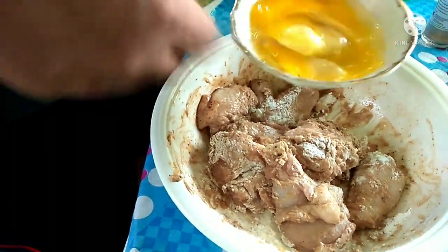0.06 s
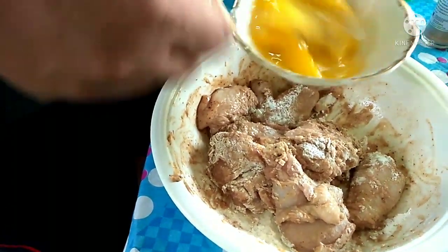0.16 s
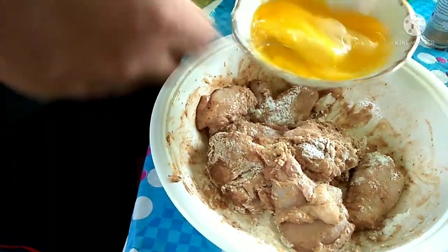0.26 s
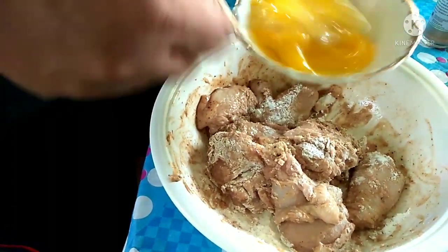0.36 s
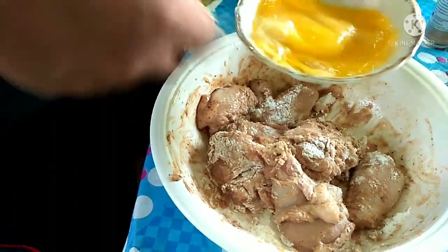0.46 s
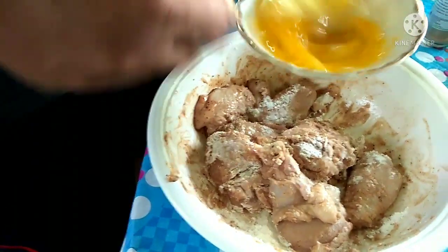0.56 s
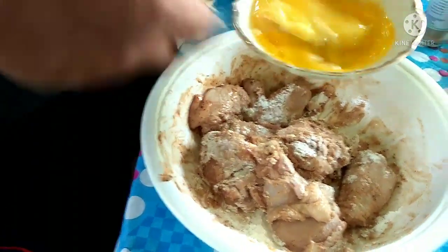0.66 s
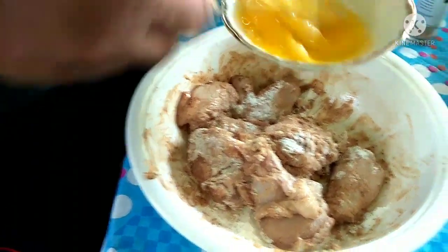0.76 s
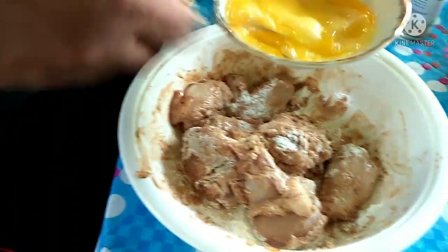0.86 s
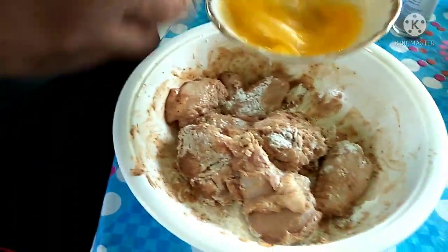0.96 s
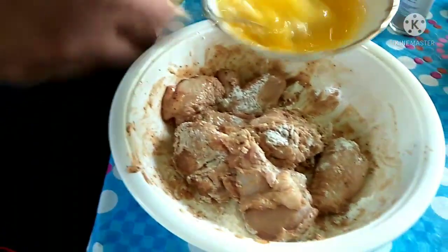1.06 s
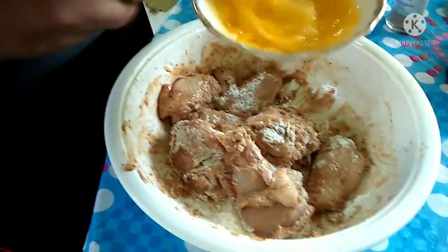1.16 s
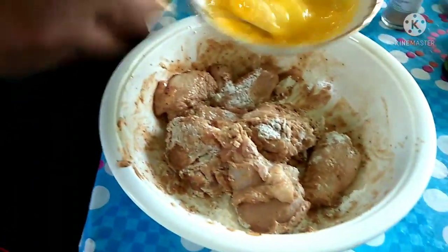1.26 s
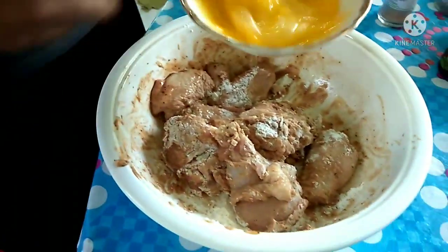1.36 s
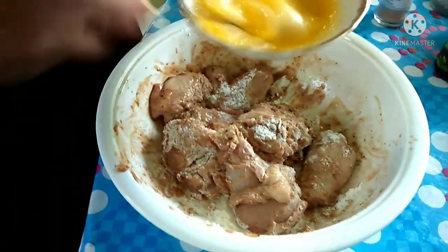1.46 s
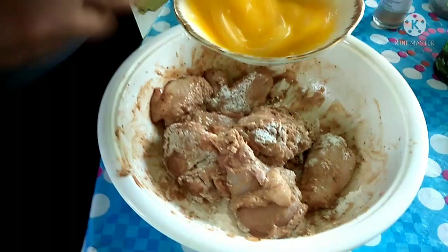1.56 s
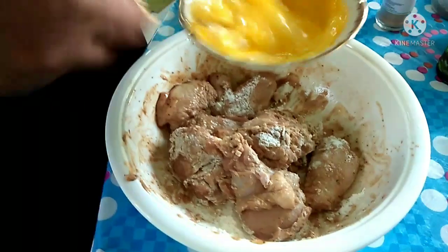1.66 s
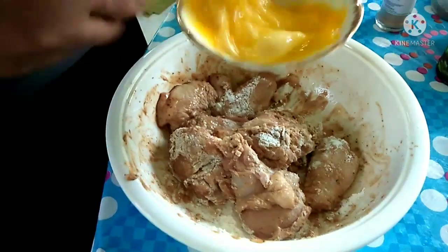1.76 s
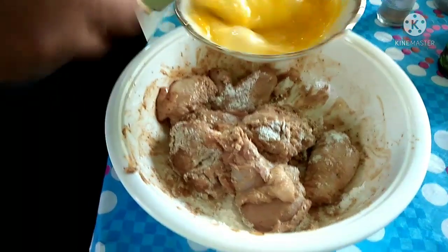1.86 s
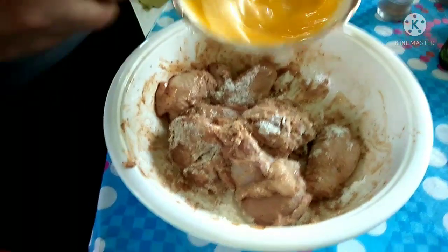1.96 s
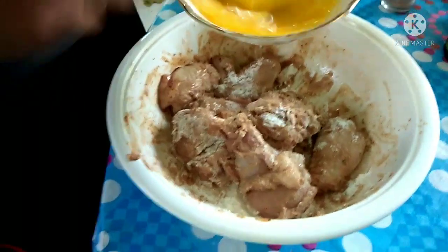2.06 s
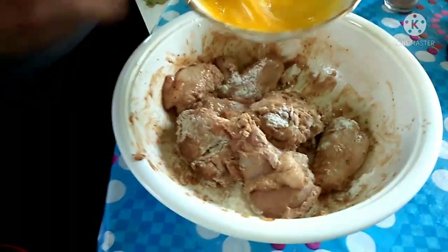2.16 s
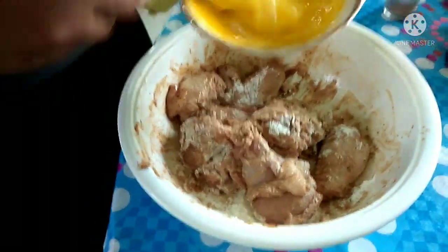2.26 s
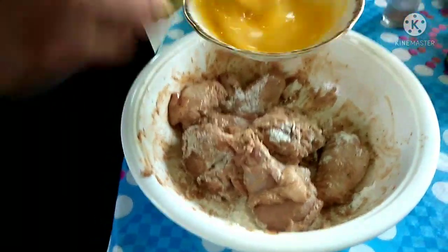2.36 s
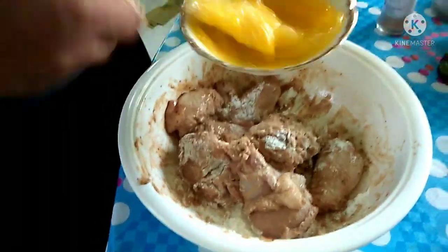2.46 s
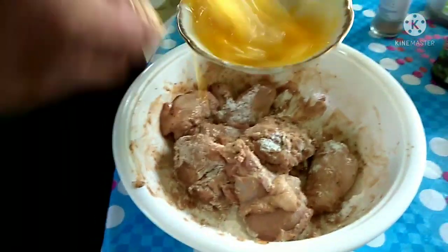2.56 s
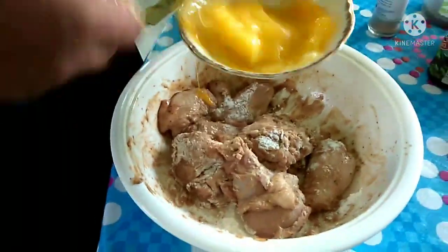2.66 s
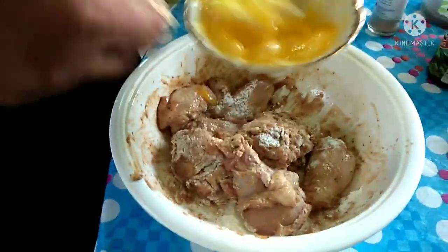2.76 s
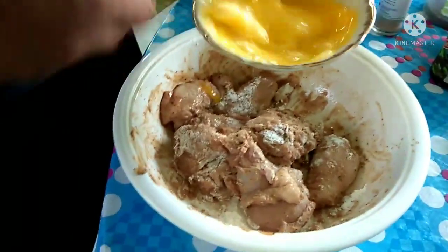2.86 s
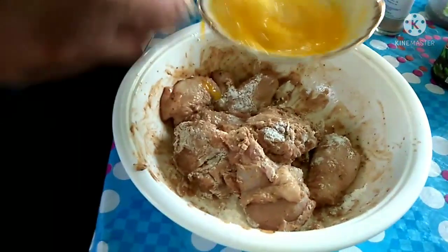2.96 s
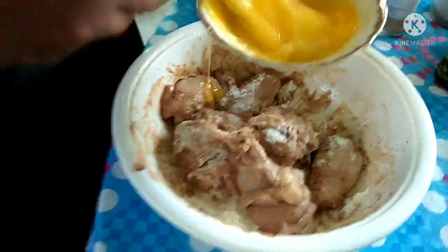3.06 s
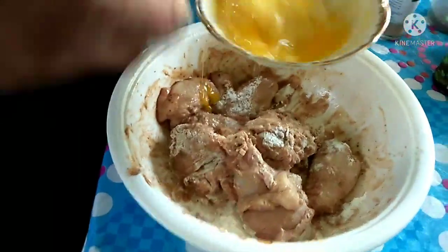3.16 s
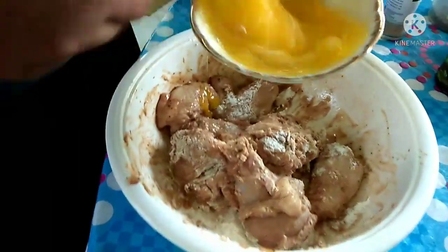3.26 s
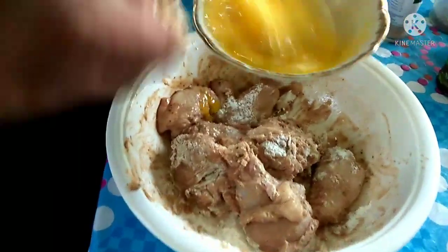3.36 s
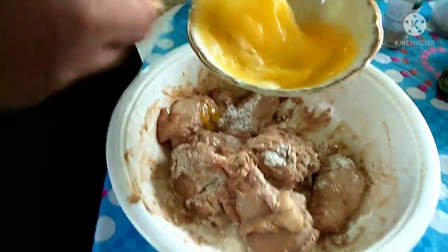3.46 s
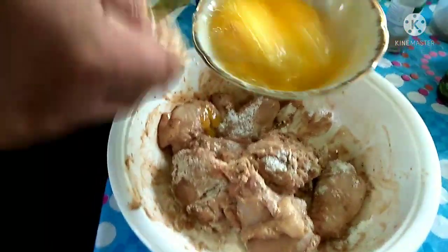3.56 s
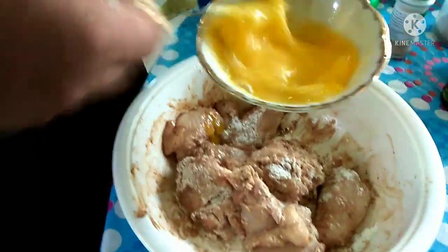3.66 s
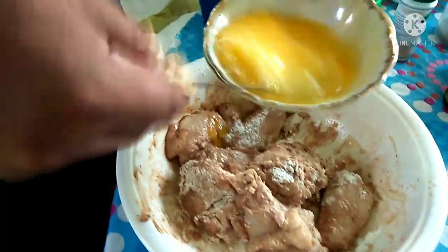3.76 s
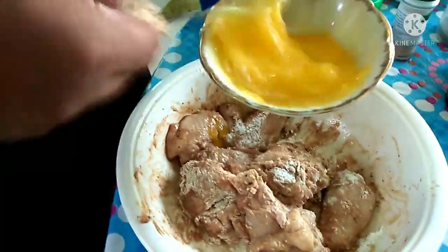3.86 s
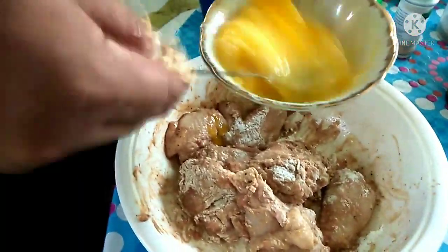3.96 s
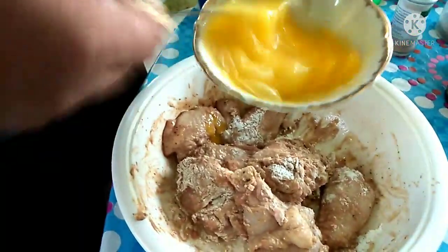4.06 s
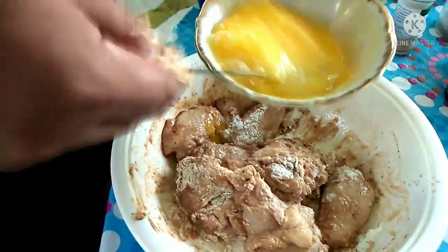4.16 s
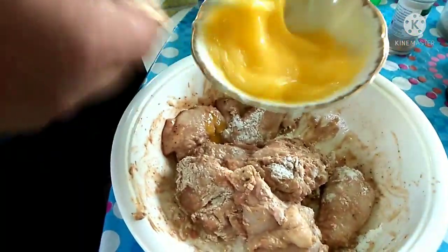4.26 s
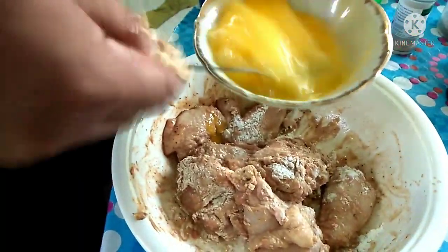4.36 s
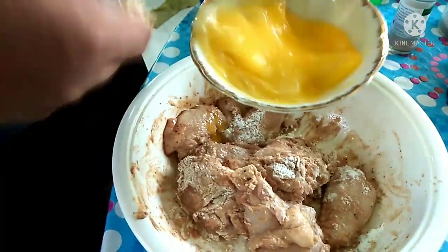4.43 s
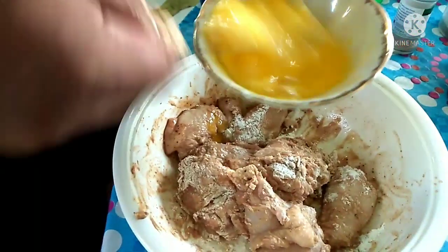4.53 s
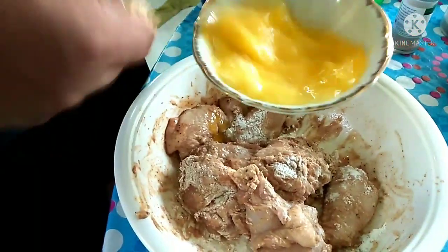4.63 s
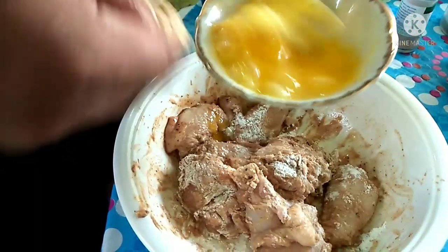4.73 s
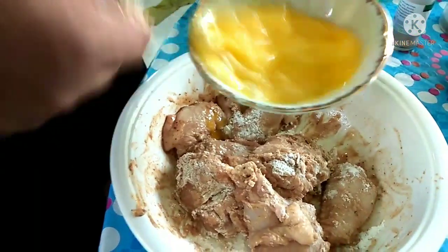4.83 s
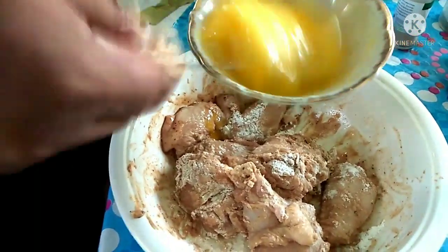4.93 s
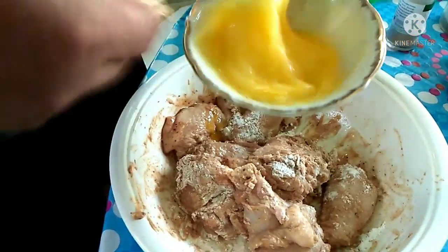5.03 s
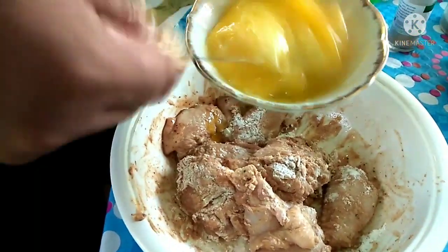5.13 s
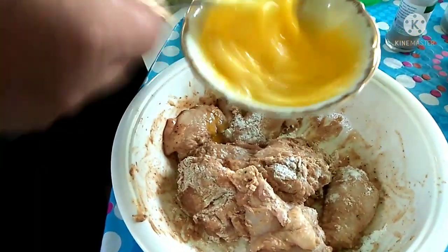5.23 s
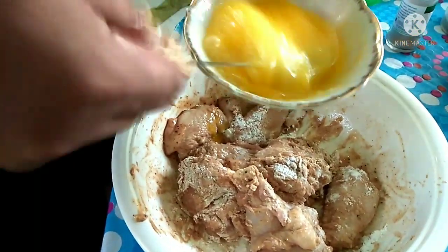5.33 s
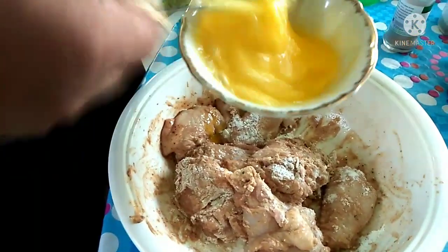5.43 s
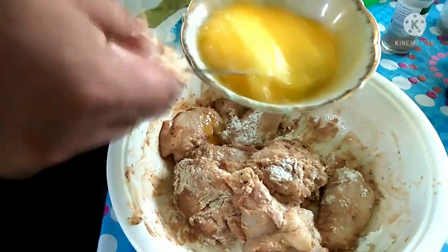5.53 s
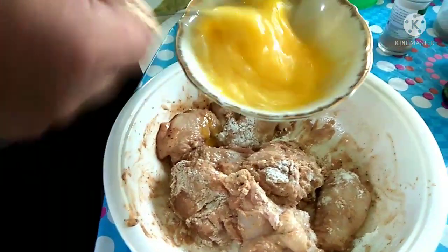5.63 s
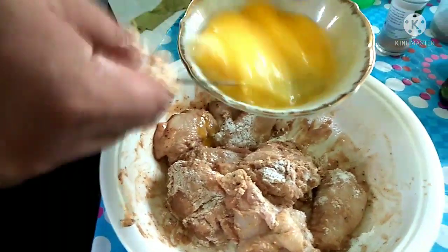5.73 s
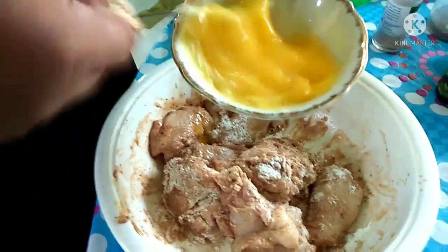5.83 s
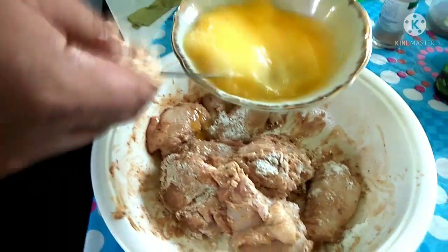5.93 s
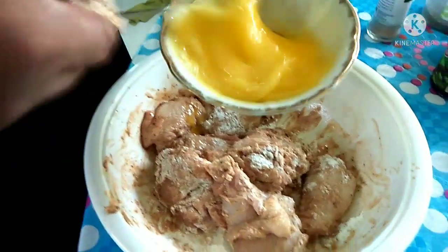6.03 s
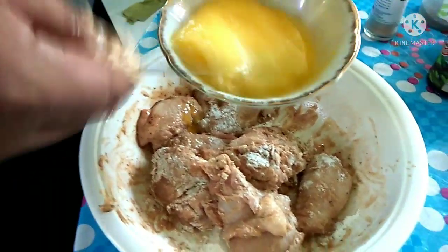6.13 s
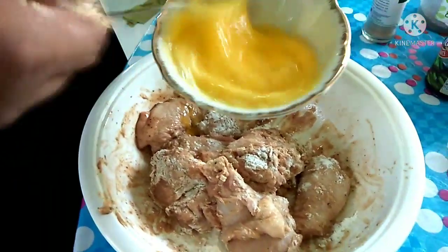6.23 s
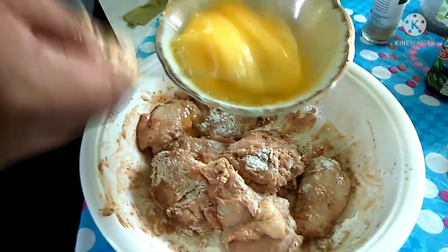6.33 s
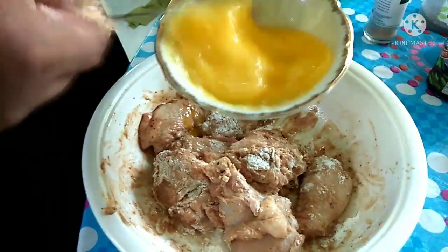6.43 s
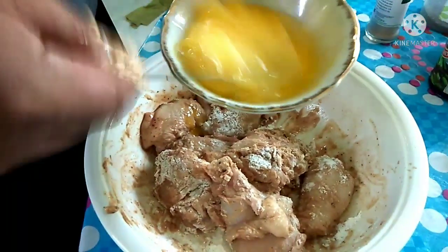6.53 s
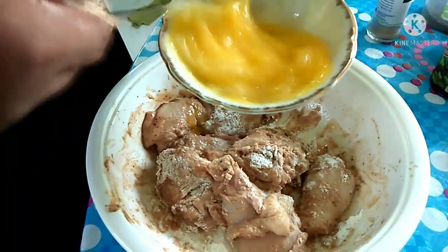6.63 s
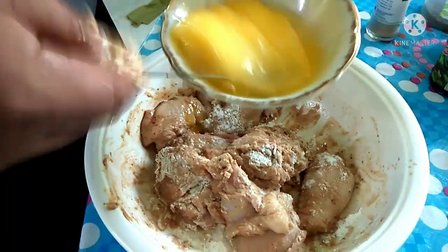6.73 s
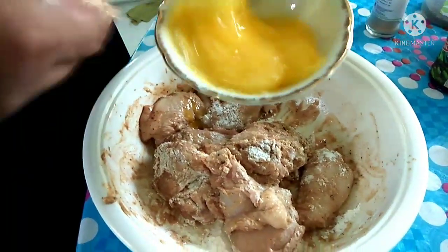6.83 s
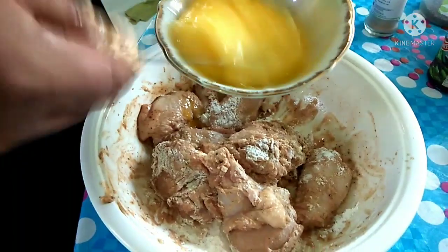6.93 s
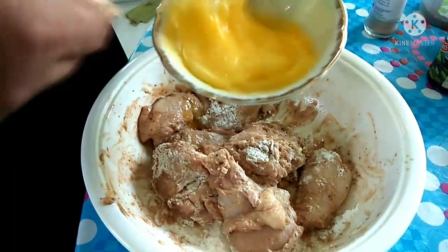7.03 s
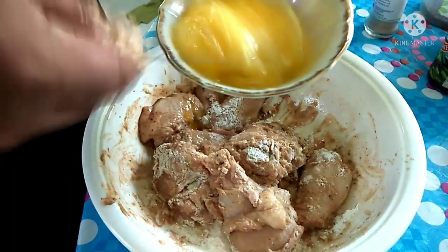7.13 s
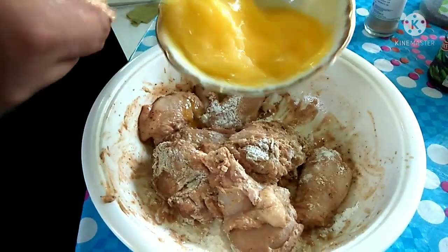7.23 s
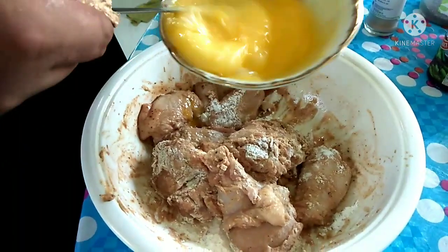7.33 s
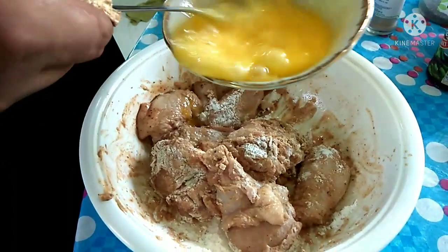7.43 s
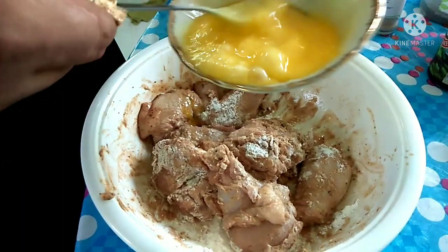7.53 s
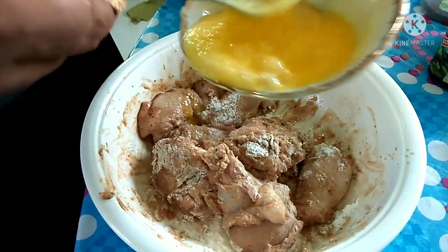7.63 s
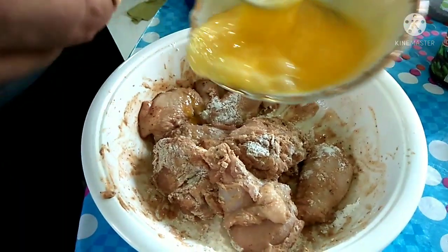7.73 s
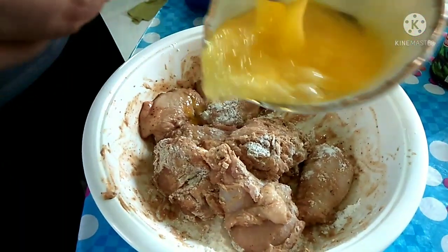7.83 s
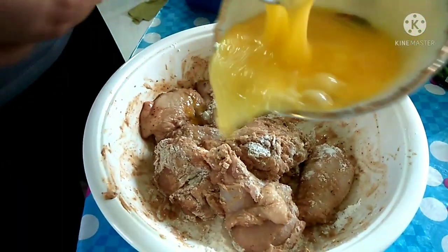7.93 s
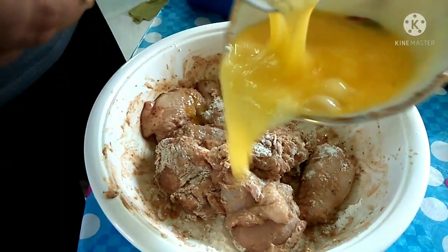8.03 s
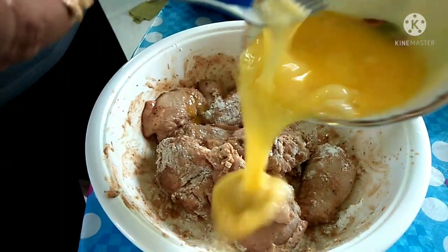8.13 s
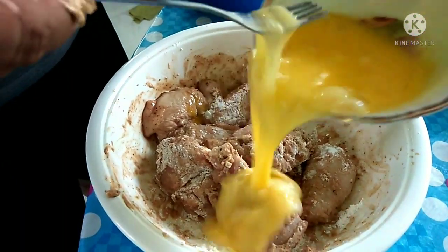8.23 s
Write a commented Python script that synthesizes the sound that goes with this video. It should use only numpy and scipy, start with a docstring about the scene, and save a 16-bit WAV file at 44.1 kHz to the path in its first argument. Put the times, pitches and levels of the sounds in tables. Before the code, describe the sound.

A fork beats eggs in a small hand-held ceramic bowl, close to a stereo microphone and slightly left, in a hard-walled kitchen with a short bright reverberation of about a quarter second. From 0 to 1.1 s the strokes are lighter and uneven, with a sharp clink near 0.35 s and a rounded plop around 0.33 s. From about 1.2 to 7.3 s it is fuller and steady, close to five strokes a second: each has a wet splash, a hissy tear of spray, midrange slosh, a gritty scrape and one or two short clinks, dulled by the egg. Scrapes are strongest between 1.3 and 3.3 s; small gliding bubble plops and soft low bumps are scattered through. At about 7.35 s the beating stops and its echo dies. Until about 8.4 s only quiet room air remains, with very faint low bumps around 7.7 to 8.05 s and tiny bubble blips near 8.2 s as the egg pours almost silently.

```python
"""A fork beats eggs in a small hand-held ceramic bowl, five strokes a second, in a hard-walled kitchen.
In each stroke the tines splash in, tear the egg into spray (noise grains), slosh it, trap air (gliding
decaying tones) and scrape the glaze; they tap the wall, whose egg-damped modes ring briefly.
The walls answer with decaying noise. The beating stops, the egg slides out almost silently, and faint
bumps and bubbles are left over the room air."""
import sys
import numpy as np
from scipy import signal
from scipy.fft import rfft, irfft, next_fast_len
from scipy.io import wavfile
from scipy.ndimage import uniform_filter1d, map_coordinates

SR = 44100
rng = np.random.default_rng(int(sys.argv[2]) if len(sys.argv) > 2 else 0)


def write(x):
    x = np.atleast_2d(x).T
    wavfile.write(sys.argv[1], SR, np.round(np.clip(x, -1, 1) * 32767).astype(np.int16))

N = 365588  # length in samples


def amp(db):
    """Level: a gain is ten to the power of dB over twenty."""
    return 10 ** (np.asarray(db) / 20)


def unit(x):
    """Normalisation: scale to rms 1."""
    return x / np.sqrt(np.mean(x ** 2) + 1e-20)


def along(points, hz):
    """Interpolation on a logarithmic frequency axis of (f/Hz, value) points."""
    f, v = np.transpose(points)
    return np.interp(np.log(hz + 1), np.log(f + 1), v)


def filtered(x, response):
    """Linear filtering: the spectrum is multiplied by a response of frequency."""
    n = x.shape[-1]
    padded = next_fast_len(n + 8192)
    return irfft(rfft(x, padded) * response(np.fft.rfftfreq(padded, 1 / SR)), padded)[..., :n]


def add(track, s, sound):
    """Superposition: mix a sound into a track from time s."""
    start = max(round(s * SR), 0)
    part = track[..., start:start + sound.shape[-1]]
    part += sound[..., :part.shape[-1]]


# Main source: whisking

# Beating strokes: plunge t/s, sweep to the wall/s, drag after it/s, touch of the tines level/dB,
# entry splash level/dB, egg spray level/dB, tine scrape level/dB, slosh level/dB
STROKE_TABLE = [ (0, 0.0013, .015, -63, -50, -44, -47.5, -51.5),
                (0.1074, 0.066, .03, -36, -50.5, -49.5, -55, -49.5),
                (0.3264, .023, .04, -24, -62, -31.5, -37, -37),
                (0.546, 0.012, 0.048, -34, -44.5, -35.5, -38, -38.5),
                (0.757, 0.014, 0.031, -58, -60.5, -41.5, -45.5, -38),
                (0.9506, 0.023, 0.049, -51, -50, -41, -44.5, -41),
                (1.145, 0.015, 0.057, -58, -56, -37, -31.5, -38.5),
                (1.3159, 0.022, 0.081, -39, -53, -27.5, -22.5, -34.5),
                (1.5229, 0.031, 0.076, -40, -51.5, -34, -31, -32),
                (1.736, 0.014, 0.055, -52, -53.5, -34.5, -27.5, -31),
                (1.917, .026, 0.067, -22, -36, -31, -25, -36),
                (2.1114, 0.022, 0.058, -42, -57.5, -32, -28.5, -34.5),
                (2.2995, .022, 0.051, -34, -55.5, -30.5, -32, -37),
                (2.514, 0.016, 0.062, -60, -62.5, -38.5, -38, -40),
                (2.712, 0.0087, 0.048, -55, -53, -34.5, -34, -38),
                (2.92, 0.027, 0.046, -33, -32, -32.5, -33, -34.5),
                (3.1, 0.011, 0.079, -59, -53, -35.5, -26.5, -36),
                (3.284, 0.014, 0.064, -54, -52, -30.5, -27, -35.5),
                (3.457, 0.05, .03, -22.5, -40, -35.5, -44, -40),
                (3.669, .031, .04, -25, -45.5, -35.5, -32.5, -31.5),
                (3.8527, 0.066, 0.029, -21.5, -46.5, -27, -27.5, -33),
                (4.0869, 0.011, 0.044, -26.5, -52, -45.5, -43.5, -42.5),
                (4.25, .028, 0.069, -27, -39, -31, -31, -36), (4.454, 0.034, .03, -20, -50, -33, -38, -30),
                (4.6636, 0.032, 0.011, -29.5, -55, -32.5, -32.5, -36),
                (4.8516, .039, .04, -32.5, -37, -33.5, -38, -36.5),
                (5.054, 0.014, .045, -25, -39, -31, -33.5, -31.5),
                (5.2626, 0.017, 0.063, -35, -39, -33, -35.5, -33.5),
                (5.472, .016, .05, -62, -50.5, -34.5, -46, -34.5),
                (5.6593, .038, .02, -35, -46, -40, -53, -38.5),
                (5.8592, .041, 0.03, -30, -35.5, -31, -31.5, -30),
                (6.0621, .025, .05, -26, -56, -34, -39, -34.5),
                (6.2652, 0.028, 0.086, -24.5, -48, -26.5, -28, -33.5),
                (6.4713, 0.053, 0.016, -36, -44, -38, -42.5, -42),
                (6.6709, 0.058, 0.015, -27, -49.5, -25.5, -33.5, -29.5),
                (6.8684, 0.049, 0.045, -34, -29.5, -38.5, -38.5, -37),
                (7.0694, .028, .04, -23, -43, -32, -29, -37.5),
                (7.272, 0.041, .02, -37, -33, -38.5, -42, -49)]
WAKE_DB_PER_S = 121  # the wake fades as the fork slows past the wall
SPLASH_S = .008  # time constant of the splash as the tines enter


def stroke_gain(release, order, skim=.004, entry_db=0, sweep_db=-20, wake_db=-11,
                rise=.004, fall=.012, flutter_db=10.5):
    """Amplitude envelope: each stroke skims, splashes in, sweeps, surges at the wall and drags a wake.

    order is the column of STROKE_TABLE that sets the level; skim, rise, fall and release are in s."""
    gain = np.zeros(N)
    for stroke in STROKE_TABLE:
        s, sweep, drag, _, splash_db = stroke[:5]
        start = max(s - .04, 0)
        t = np.arange(SR // 3) / SR + start - s  # zero at the plunge
        past = t - sweep  # zero at the wall
        splash = amp(splash_db + entry_db) * np.exp(-np.maximum(t, 0) / SPLASH_S)
        surge = np.exp(-np.abs(past) / np.where(past < 0, rise, fall))
        flow = amp(np.where(past < 0, sweep_db, wake_db - WAKE_DB_PER_S * past))
        motion = amp(stroke[order]) * np.maximum(surge, flow)
        # the fork lifts once the drag is over
        immersed = np.exp(np.minimum(t, 0) / skim - np.maximum(past - drag, 0) / release)
        add(gain, start, immersed * (splash + motion))
    return gain * amp(flutter_db * wobble(rate=220))


def wobble(rate):
    """Random modulation: a curve joining random knots, rate knots a second."""
    knots = rng.standard_normal(4096)
    return map_coordinates(knots, [np.arange(N) * rate / SR], order=1, mode="wrap")


# Relative spectra of egg spray, tine scrape and slosh: f/Hz, level/dB (per Hz)
SPRAY_SPECTRUM = [(2000, -38.5), (4500, -10.5), (6300, 1.5), (7200, -3.5), (8000, -4.5), (9500, -4.5),
                  (10800, 4), (12700, -2.5), (14500, 7), (15500, -3)]
SCRAPE_SPECTRUM = [(2000, -48), (3500, -24.5), (4300, -11.5), (4720, -1), (5050, -6), (5600, 0),
                   (6100, -21.5), (6900, -35), (10000, -35)]
SLOSH_SPECTRUM = [(60, -29.5), (300, -18), (480, -9), (750, 1.5), (1150, 1), (1450, -1), (1850, -5),
                  (2450, 3), (2950, -3.5), (3500, 2), (4200, -6.5), (6000, -39.5), (12000, -62)]


def whisking(grip_db=-26):
    """Flow and friction noise: films tear into spray, tines stick and slip, the liquid sloshes and bubbles."""
    burst = stroke_gain(release=.005, order=5, skim=0.0035, entry_db=-3.5, sweep_db=-31, wake_db=-9,
                        rise=0.0055, fall=0.012, flutter_db=1.5)
    spray_grains = grains(SPRAY_SPECTRUM, rate=6400, smooth=0.73)
    spray = amp(1.5) * burst * patchy(spray_grains, depth_db=5.0, width_hz=1100, length=.03)

    # wet tines can grip the glaze only so hard before they slide
    press = stroke_gain(release=0.0046, order=6, skim=0.0036, entry_db=-8, sweep_db=-24, wake_db=-16,
                        rise=0.0057, fall=0.013, flutter_db=3.5)
    drag = press / np.sqrt(1 + (press / amp(grip_db)) ** 2)
    scrape_grains = grains(SCRAPE_SPECTRUM, rate=2800, smooth=0.79)
    scrape = amp(1.5) * drag * patchy(scrape_grains, depth_db=0, width_hz=362)

    stir = stroke_gain(release=.005, order=7, skim=0.0038, entry_db=-4.5, sweep_db=-19.5, wake_db=-8,
                       rise=0.0042, fall=0.011, flutter_db=3)
    slosh_grains = grains(SLOSH_SPECTRUM, rate=700, smooth=.5)
    slosh = amp(-3) * stir * patchy(slosh_grains, depth_db=6.0, width_hz=220, length=.025)
    fizz = blips(stir)

    # larger bubbles follow just behind the tines
    gurgle = blips(np.roll(stir, SR // 80), rate=130, low_hz=376.0, high_hz=1590, cycles=9.6,
                   rise=.1, scatter_db=1.0)
    return spray + scrape + slosh + amp(-0.5) * fizz + amp(-8.5) * gurgle


def grains(spectrum, rate, smooth):
    """Shot noise: random clicks, rate a second, on a share of smooth noise; coloured stereo of rms 1."""
    clicks = unit((rng.random(N) < rate / SR) * rng.standard_normal((2, N)))
    mix = ports(clicks + smooth * rng.standard_normal((2, N)))
    return unit(filtered(mix, lambda hz: amp(along(spectrum, hz))))


# Left-right likeness of diffuse sound: f/Hz, correlation (0 unrelated, 1 identical)
LIKENESS = [(60, 0.48), (400, 0.69), (800, 0.74), (1400, 0), (2200, 0.97), (5000, 0)]


def ports(pair):
    """Interchannel coherence: two unrelated signals become left and right, as alike as each band asks."""
    def turn(hz):
        return np.arccos(np.clip(along(LIKENESS, hz), -1, 1)) / 2
    mid, side = filtered(pair, lambda hz: np.array([np.cos(turn(hz)), np.sin(turn(hz))]))
    return np.array([mid + side, mid - side])


def patchy(pair, depth_db, width_hz=600, length=.05):
    """Time-varying filtering: the egg's surface changes shape, so its colour drifts in patches (Hz by s)."""
    z = signal.stft(pair, nperseg=512)[2]
    bands, frames = np.indices(z.shape[1:])
    place = [bands * SR / 512 / width_hz, frames * 256 / SR / length]
    field = map_coordinates(rng.standard_normal((128, 512)), place, order=1, mode="wrap")
    return unit(signal.istft(z * amp(depth_db * unit(field)))[1][:, :N])


def blips(gain, rate=420, low_hz=420, high_hz=4200, cycles=6.3, rise=.12, scatter_db=4):
    """Bubble resonance: small bubbles burst through the slosh as damped tones that bend upwards."""
    u = rng.random((int(rate * N / SR), 4))
    start = (u[:, 0] * (N - 1)).astype(int)
    hz = low_hz * (high_hz / low_hz) ** u[:, 1:2]
    life = cycles * (.5 + u[:, 2:3]) / hz
    # most are weak, a few stand out
    scatter = scatter_db * np.log(np.maximum(u[:, 3:], .08))
    size = amp(along(SLOSH_SPECTRUM, hz) - scatter) * np.sqrt(hz / life)
    # the whole swarm is brought to about rms 1 before the stroke shapes it
    size = size / np.sqrt(np.sum(size ** 2 * life) * SR / (4 * N)) * gain[start, None]
    t = np.arange(SR // 25) / SR
    turns = hz * (t + rise * (t - life * (1 - np.exp(-t / life))))
    waves = size * np.exp(-t / life) * (1 - np.exp(-2 * hz * t)) * np.sin(2 * np.pi * turns)
    index = start[:, None] + np.arange(len(t))
    # each bubble reaches the right up to seven samples late
    lag = rng.integers(0, 8, (len(start), 1))
    return np.array([np.bincount((index + d).ravel(), waves.ravel(), N)[:N] for d in (0, lag)])


# Fork on the wall: t/s, level/dB, knock of the body level/dB, centre of the clink f/Hz
TAP_TABLE = [(0.1223, -39.5, 5.5, 2300), (0.1641, -33.5, -8.5, 2970), (.3087, -37, -4.5, 2850),
             (0.35, -11.5, -16, 5450), (.515, -32, -14, 3600), (0.5577, -16, -36, 5370),
             (.715, -46.5, -2, 2390), (0.7655, -30, -11, 3100), (1.1234, -38.5, -2, 3120),
             (1.1592, -16.5, -23.5, 5200), (1.3364, -7.5, -15, 5600), (1.502, -29.5, -4.5, 3100),
             (1.5498, -9.5, -13.5, 5600), (1.7047, -35, 2, 2940), (1.748, -13.5, -14.5, 2770),
             (1.782, -26.5, -7, 2390), (1.944, -9, -17.5, 2700), (2.137, -9, -14.5, 5000),
             (2.3121, -19, -26.5, 5560), (2.3213, -5.5, -16.5, 5160), (2.5267, -17, -19.5, 5200),
             (2.594, -28.5, -14.5, 4800), (2.7214, -12.5, -20, 4900), (2.9248, -12.5, -14.5, 3040),
             (2.9482, -7.5, -24, 5240), (3.1043, -19, -19, 4900), (3.113, -9.5, -17.5, 3280),
             (3.1861, -27, -13.5, 3060), (3.2952, -9.5, -31.5, 5570), (3.7008, -17, -6, 3040),
             (3.836, -26.5, -14, 2930), (3.8877, -14.5, -22, 4500), (3.922, -8, -16.5, 3850),
             (4.0579, -30, -10.5, 2730), (4.279, -8, -14, 5500), (4.444, -35, 2, 3050),
             (4.4904, -15, -7, 2500), (4.696, -14, -7, 2900), (4.8926, -13, -9, 4900),
             (5.0605, -23, -8, 3170), (5.068, -13, -19, 4940), (5.274, -16.5, -11, 3620),
             (5.313, -32, -3.5, 3046), (5.4872, -14.5, -18, 5070), (5.6443, -38, -13, 2750),
             (5.6986, -34, 2, 2000), (5.899, -20.5, -27, 4680), (5.9101, -25, -8, 5640),
             (6.0883, -11.5, -16.5, 5200), (6.13, -26.5, -25, 2960), (6.2891, -16, -7.5, 3100),
             (6.329, -8, -16.5, 4630), (6.521, -23, -17.5, 5600), (6.538, -27, -39, 3270),
             (6.638, -49, -2.5, 2700), (6.7237, -11, -12.5, 5570), (6.7355, -13, -18, 3140),
             (6.9197, -18, -9, 5680), (6.9401, -21.5, -13, 5540), (7.072, -17.5, -10, 5400),
             (7.0993, -17, -14.5, 5410), (7.2779, -20, -33, 2980)]
# Modes of the egg-filled bowl with the fork against it: f/Hz, level/dB, t60/s
BOWL_MODES = [(728, -8, 0.039), (1089, 2, 0.033), (1383, 0, 0.017), (2097, -8, 0.014), (2804, 2, 0.014),
              (3069, 0.5, 0.019), (3650, -6, 0.019), (4202, -3, 0.022), (4620, -0.5, 0.01),
              (5277, -1.5, 0.019), (5620, -5.5, 0.028), (7740, -7.5, 0.011), (8760, -14.5, 0.039),
              (11500, -14, 0.02), (14650, -5.5, 0.011)]
# the entering tines touch the bottom through the egg: dull, with much body
TOUCH_KNOCK_DB, TOUCH_HZ = -10, 2880
TOUCH_SCATTER_OCTAVES = 0.22  # the tines never enter at quite the same spot
TINE_GAP_S, TINE_DB = 0.0026, -11.5  # a second tine lands about this long after the first, weaker


def taps(body_hz=1800, spread_octaves=.8, scatter_db=1.5, crack_db=-11, crack_t60=0.0064,
         port_lag=.00012, firm_db=-19, soft_hz=4200, knock_rise=0.0011):
    """Modal excitation: each contact rings the bowl's modes; its place and force set the brightness."""
    out, t = np.zeros((2, N)), np.arange(SR // 25) / SR
    hz, mode_db, t60 = np.transpose(BOWL_MODES)
    body = hz < body_hz
    touches = [(s, touch_db, TOUCH_KNOCK_DB, TOUCH_HZ * 2 ** (TOUCH_SCATTER_OCTAVES * rng.normal()))
               for s, _, _, touch_db, *_ in STROKE_TABLE]
    for s, db, knock_db, centre_hz in TAP_TABLE + touches + tine_ticks():
        size, detune, phase, skew = rng.standard_normal((4, len(hz)))
        # a light touch is cushioned by the egg: slower attack, no top
        firm = min(amp(db - firm_db), 1) ** 1.2
        cushion = firm + (1 - firm) / (1 + (hz / max(soft_hz, centre_hz)) ** 8)
        near = np.exp(-(np.log2(hz / centre_hz) / spread_octaves) ** 2)
        focus = np.maximum(near, .35) * cushion
        gain = amp(mode_db + scatter_db * size) * np.where(body, 1, focus)
        # high modes reach the two microphone ports in unrelated phases
        lag = np.array([[1], [-1]]) * (port_lag + .00005 * skew) / 2
        mode_hz = (hz * (1 + 0.029 * detune))[:, None]
        angle = 2 * np.pi * (mode_hz * (t - lag[..., None]) + phase[:, None])
        rings = gain[:, None] * amp(-60 * t / t60[:, None]) * np.sin(angle)
        crack = firm * amp(crack_db - 60 * t / crack_t60) * rng.standard_normal((2, len(t)))
        attack = 1 - np.exp(-(t / (0.00053 + 0.00026 * (1 - firm))) ** 2)
        clink = (rings[:, ~body].sum(1) + crack) * attack
        knock = rings[:, body].sum(1) * (1 - np.exp(-(t / knock_rise) ** 2))
        tap = amp(1.5) * clink / np.abs(clink).max() + amp(knock_db + 1.5) * knock / np.abs(knock).max()
        add(out, s + .0006, amp(db) * tap)
        second_tine_s = 0.00056 + TINE_GAP_S * (.5 + rng.random())
        add(out, s + second_tine_s, amp(db + TINE_DB) * tap)
    return out


# ticks along the glaze: level over the slosh, knock of the body, centre of the clink
TICK_DB, TICK_KNOCK_DB, TICK_HZ = 0, -9, 3400


def tine_ticks(count=2, scatter_db=3, spread_octaves=.4):
    """Intermittent contact: dragging past the wall, the tines tick on the glaze, each time in another colour."""
    ticks = []
    for s, sweep, drag, *_, slosh_db in STROKE_TABLE:
        when = rng.random(count)
        sizes, colours = rng.standard_normal((2, count))
        for u, size, colour in zip(when, sizes, colours):
            tick_db = slosh_db + TICK_DB + scatter_db * size
            centre_hz = TICK_HZ * 2 ** (spread_octaves * colour)
            ticks.append((s + sweep + drag * u, tick_db, TICK_KNOCK_DB, centre_hz))
    return ticks


# Larger air pockets in the egg: t/s, f/Hz, level/dB, swell/s, glide/(octaves per s)
BUBBLE_TABLE = [(.014, 542, -45.5, 0.0022, 7.5), (.125, 1550, -40.5, 0.0059, 11),
                (.265, 263, -59, 0.013, 1), (.328, 637.4, -17.5, .014, 16), (.398, 925, -36.5, 0.017, 14),
                (.516, 3430, -34, .002, 3), (.579, 492, -44, 0.0018, 3.5), (1.01, 1303, -40.5, 0.0012, 5),
                (1.503, 650, -37.5, .005, 6), (1.55, 684, -33.5, .011, 5.5),
                (1.601, 399.5, -42.5, 0.0029, -5.5), (1.705, 487, -45.5, 0.0037, 8.5),
                (1.749, 884, -30, 0.0013, -3), (1.772, 793, -30.5, .001, 0.5),
                (1.922, 1059, -29.5, 0.0059, 2.5), (1.942, 1292, -28, 0.005, 2.5),
                (2.1129, 3100, -28, .001, -3), (2.14, 1095, -28, .006, -1.5),
                (2.302, 721, -37.5, 0.0068, -1), (2.323, 754, -31, 0.012, 2),
                (2.528, 1164, -32.5, 0.0063, -8.5), (2.924, 1085, -34, 0.0046, 9.5),
                (3.142, 467, -41.5, 0.0049, -6.5), (3.297, 1120, -22.5, 0.0019, 5),
                (3.32, 1107, -32.5, 0.0084, -7), (3.456, 673, -35.5, 0.0012, -8),
                (3.668, 975, -26.5, 0.0024, 10), (3.721, 1116, -37, .001, 1.5),
                (3.89, 1086, -25, 0.003, 11.5), (4.087, 475, -39, 0.0019, 6.5),
                (4.455, 606, -28, 0.0013, -8), (4.663, 659, -28, 0.0029, 8),
                (4.853, 649, -33.5, 0.0095, 5.5), (5.07, 565, -39, 0.0046, -1),
                (5.313, 1126, -29.5, 0.0008, -2.5), (5.315, 580, -44, .002, 5.5),
                (5.456, 682, -47.5, 0.0028, 0), (5.698, 742, -41.5, 0.0083, 2.5),
                (5.859, 1346, -28, 0.00085, 3), (5.91, 1414, -29.5, 0.00089, 1),
                (6.019, 658, -49.5, 0.001, 6), (6.119, 521, -44, 0.0029, 6.5),
                (6.329, 736, -32.5, 0.0035, 2), (6.705, 466, -39.5, 0.043, 2.5),
                (6.727, 1482, -24.5, 0.0005, -17), (7.072, 586, -31.5, 0.0018, -5),
                (7.1, 591, -30.5, .002, -4), (7.277, 701.5, -23, 0.0009, 2.5),
                (8.158, 2470, -64, .002, 5.5), (8.264, 1275, -54.5, 0.0052, 8),
                (8.266, 2580, -63, 0.0022, 1.5)]
BUBBLE_CYCLES = 6  # a bubble fades to about a third in this many cycles of its first pitch


def bubbles():
    """Bubble resonance: trapped air rings at a pitch that glides, mostly up as it nears the surface."""
    out, t = np.zeros(N), np.arange(SR // 8) / SR
    for s, hz, db, swell, glide in BUBBLE_TABLE:
        life = BUBBLE_CYCLES / hz
        pitch = hz * 2 ** (glide * np.minimum(t, .035))
        shape = np.exp(-np.abs(t - swell) / life) * (1 - np.exp(-t / 0.00017))
        add(out, s, amp(db) * shape * np.sin(2 * np.pi * np.cumsum(pitch) / SR))
    return np.array([out, out])


# Dull bumps of the hand and bowl: t/s, level/dB, f/Hz
BUMP_TABLE = [(0.278, -48, 113), (0.289, -41.5, 111), (1.771, -55, 96), (1.84, -52, 90), (2.147, -56, 130),
              (2.24, -53, 134), (2.81, -48, 124), (7.247, -49.5, 128), (7.695, -58.5, 191),
              (7.729, -58, 193), (7.79, -60.5, 190.6), (7.91, -64.5, 150), (7.983, -60.5, 186.4),
              (8.055, -65, 200)]


def bumps(life=0.0038):
    """Heavy damping: soft, low pushes that barely ring."""
    out, t = np.zeros(N), np.arange(SR // 10) / SR
    for s, db, hz in BUMP_TABLE:
        push = t / life * np.exp(1 - t / life)
        add(out, s, amp(db) * push * np.sin(2 * np.pi * hz * t))
    return np.array([out, out])


# Decay of the kitchen's reverberation: f/Hz, t60/s
KITCHEN_DECAY = [(200, 0.36), (480, 0.3), (760, 0.3), (1400, 0.24), (3500, 0.26), (5500, .27),
                 (10000, 0.22), (15000, 0.21)]


def kitchen(x, gap=0.0011, build=0.0011):
    """Reverberation: the walls answer with decaying noise; the tail changes as the bowl and hand move."""
    out, block = np.zeros((2, N)), SR // 5
    for start in range(0, N, block):
        hz, t, z = signal.stft(rng.standard_normal((2, SR // 2)), SR, nperseg=256)
        decay = amp(-60 * t / along(KITCHEN_DECAY, hz)[:, None])
        tail = signal.istft(z * decay, SR)[1]
        arrival = 1 - np.exp(-np.maximum(np.arange(tail.shape[1]) / SR - gap, 0) / build)
        tail = ports(tail) * arrival
        tail = tail / np.linalg.norm(tail[0])
        # the left port alone feeds the room
        add(out, start / SR, signal.fftconvolve(x[:1, start:start + block], tail, axes=1))
    return out


# Relative spectrum of the room air: f/Hz, level/dB (per Hz)
AIR_SPECTRUM = [(15, -81.5), (25, -48), (69, -27.5), (113, -10), (140, -15), (204, -10), (227, -13.5),
                (253, -23), (305, -22), (1200, -27), (2230, -29.5), (7300, -38), (15500, -34.5)]


def background():
    """Stationary and modulated noise: quiet room air, and a rumble of the arm that swells with each stroke."""
    air = unit(filtered(ports(rng.standard_normal((2, N))), lambda hz: amp(along(AIR_SPECTRUM, hz))))
    arm_spectrum = [(25, -33.0), (55, -18), (90, 0.5), (130, -2.5), (260, -8.0), (600, -8.5), (3000, -75.5)]
    arm = grains(arm_spectrum, rate=69, smooth=0.24)
    strokes = uniform_filter1d(stroke_gain(release=.03, order=7), SR // 8)
    effort = unit(np.abs(strokes) ** 0.16)
    return amp(-71.5) * air + amp(-72) * effort * arm * amp([[2.5], [-2.5]])


# Strength of the walls' answer: f/Hz, level/dB
WALL_TONE = [(200, 1.5), (600, -0.5), (1100, -5), (1900, 0.5), (2400, -2), (2900, -4), (3600, -3.5),
             (4700, -2.5), (5600, -3), (7000, 5.5), (15000, 6)]
# Drift of the bowl from side to side: t/s, left minus right level/dB
BOWL_DRIFT = [(0, 0.5), (.7, 0), (2.3, 1), (3.5, 0.5), (5.3, 0), (6.3, 0), (7.3, 0)]
# Level difference of the ports: f/Hz, left minus right level/dB
PORT_LEVEL = [(100, 6), (350, -2.5), (750, 2), (1200, -1), (2800, 2.5), (5000, 3), (8000, 7.5), (15000, 4)]
# Extra phase lag of the left port behind the right: f/Hz, phase/rad
PORT_PHASE = [(950, 0.063), (1200, 0.73), (1700, 0.013), (2600, -0.66), (4000, 0.16)]


def scene():
    """Direct and reverberant field: the bowl, a little to the left and close by, in a lively room."""
    wet, clinks, plops = whisking(), taps(), bubbles()
    to_walls = amp(-6) * wet + amp(-7.0) * clinks + amp(-3.5) * plops
    room = filtered(kitchen(to_walls), lambda hz: amp(along(WALL_TONE, hz)))
    drift_db = np.interp(np.arange(N) / SR, *np.transpose(BOWL_DRIFT))
    sides = np.array([[.5], [-.5]])  # each port takes half of a difference
    bowl = wet + amp(-1.56) * clinks + amp(0.5) * plops + bumps() + room
    bowl = bowl * amp(sides * drift_db)

    def port_response(hz):
        return amp(sides * along(PORT_LEVEL, hz)) * np.exp(-1j * sides * along(PORT_PHASE, hz))
    return filtered(bowl, port_response) + background()


TOP_HZ = 15650  # band limit


def record(dry, low_cut_hz=55):
    """Band limiting: the microphone rolls off the deep bass, the recorder all above its band limit."""
    thin = filtered(dry, lambda hz: hz ** 2 / np.sqrt(hz ** 4 + low_cut_hz ** 4))
    return filtered(thin, lambda hz: 1 / np.sqrt(1 + (hz / TOP_HZ) ** 240))


dry = scene()
out = record(dry)
write(out)
```